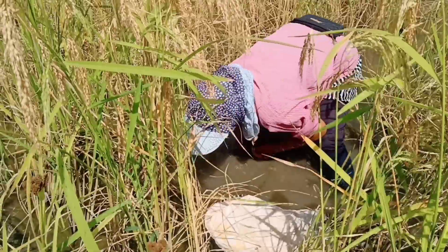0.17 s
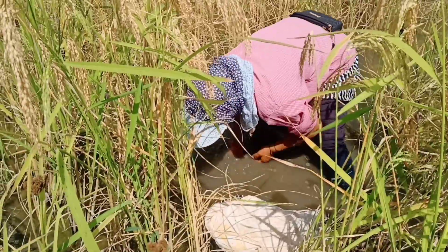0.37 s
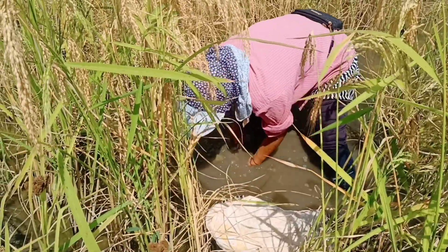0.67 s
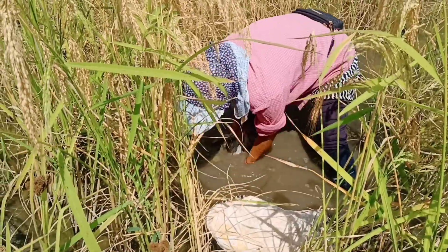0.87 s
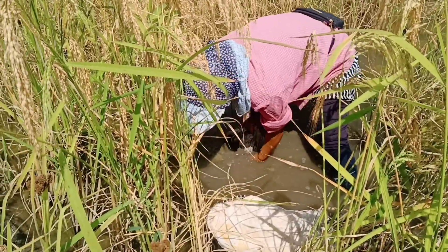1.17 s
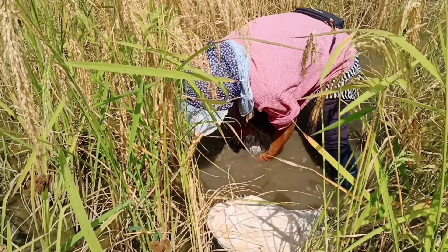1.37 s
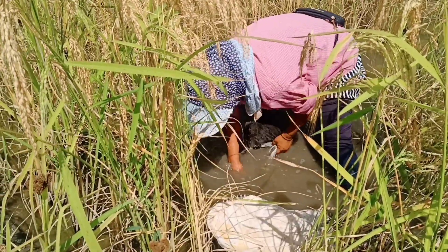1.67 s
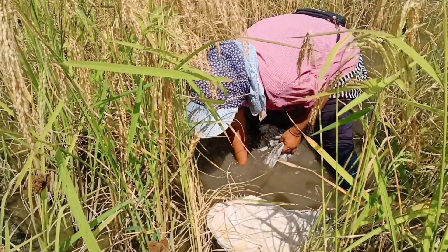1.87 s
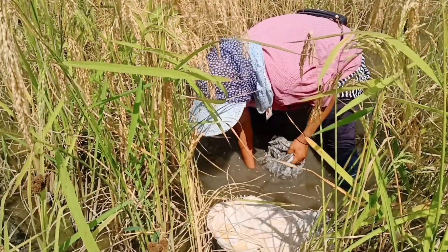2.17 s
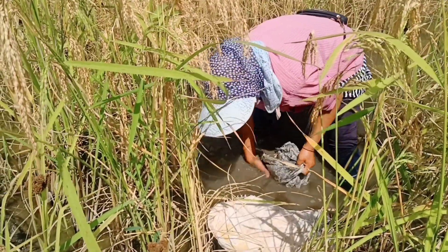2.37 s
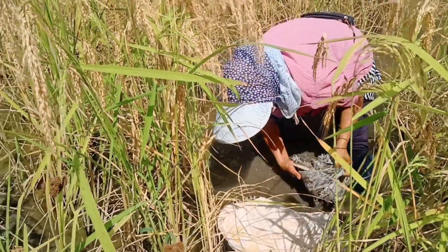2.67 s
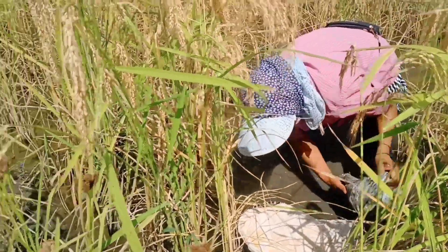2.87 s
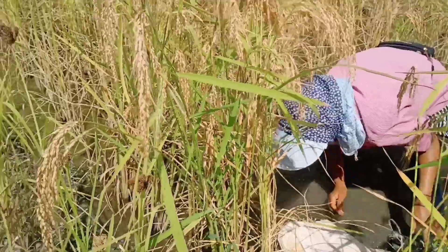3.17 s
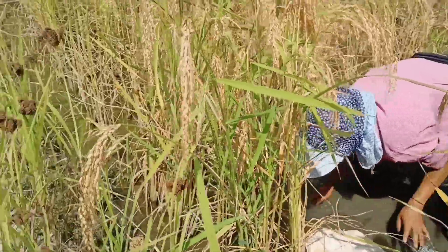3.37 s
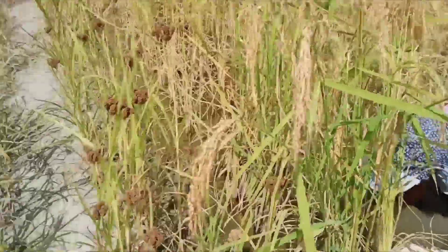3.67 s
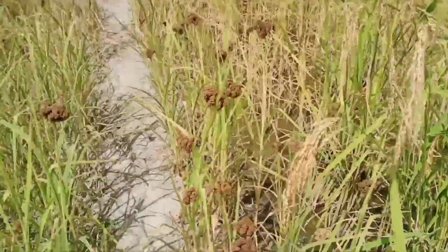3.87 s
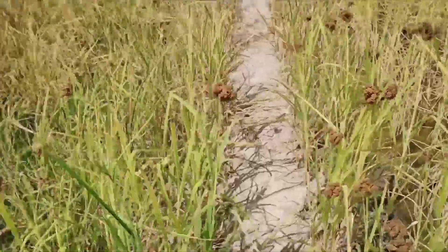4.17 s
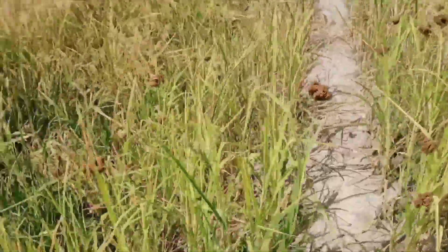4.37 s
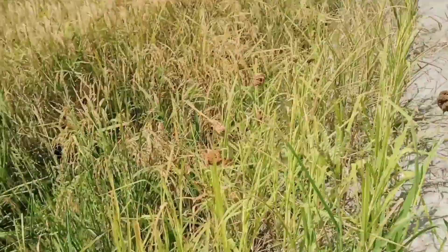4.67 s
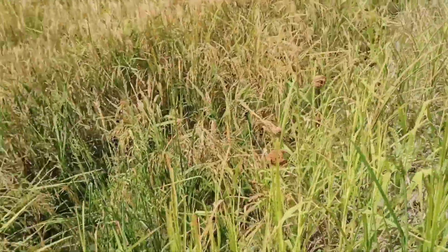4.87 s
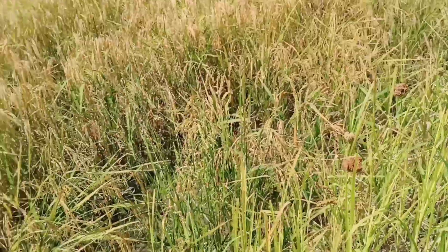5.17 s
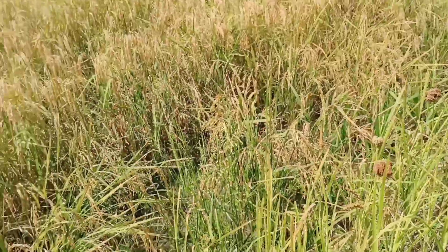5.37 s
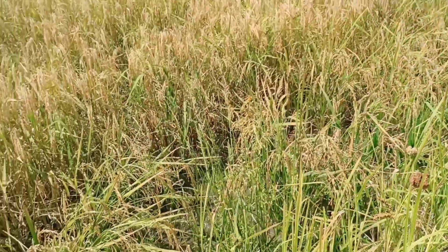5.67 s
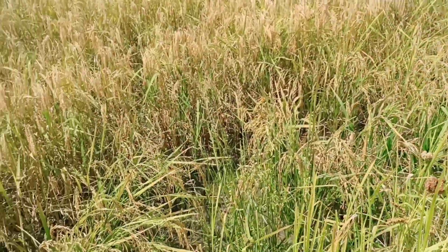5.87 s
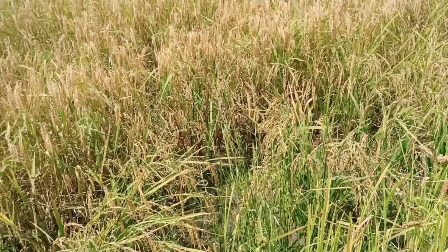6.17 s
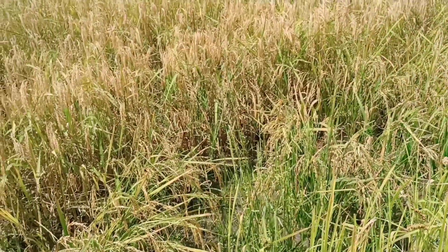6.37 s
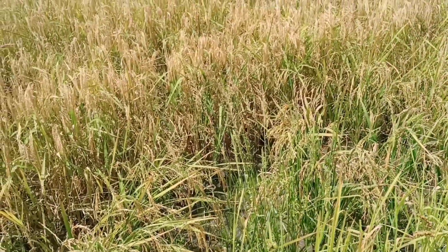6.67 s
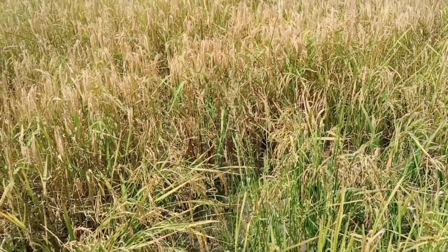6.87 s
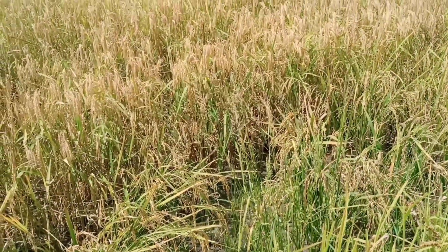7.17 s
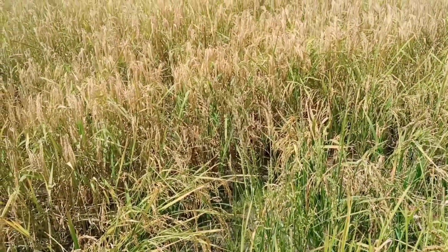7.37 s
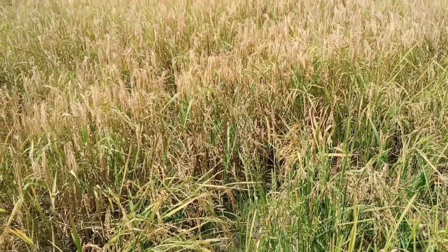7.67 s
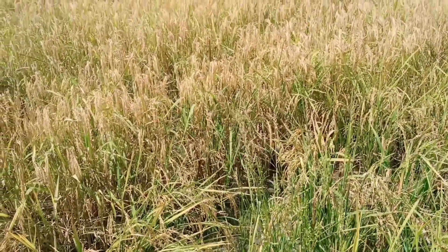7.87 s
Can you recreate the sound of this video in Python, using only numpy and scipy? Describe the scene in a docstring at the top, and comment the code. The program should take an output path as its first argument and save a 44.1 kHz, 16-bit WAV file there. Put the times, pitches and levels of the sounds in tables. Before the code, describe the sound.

A faint trickle breaks into a gurgling, splashing pour through a muddy paddy bank, later duller, with crisp dry-stalk ticks near the microphone.

```python
"""Muddy water drains through a gap in the bank of a rice paddy: deep gurgles, dense babble and fine spray.
It trickles until a plug of mud and cloth is pulled out at 1.5 s, then pours; big air pockets ring above it.
The water is made of swarms of short rising sine rings over noise, filtered to the tone of each layer.
The microphone turns away over the field, and dry rice leaves close to it rustle and tick:
clumps of tiny clicks and short rings with bright cracks."""
import sys
import numpy as np
from scipy import signal
from scipy.fft import rfft, irfft, next_fast_len
from scipy.io import wavfile
from scipy.ndimage import uniform_filter1d, map_coordinates

SR = 44100
rng = np.random.default_rng(int(sys.argv[2]) if len(sys.argv) > 2 else 0)


def bounce(signal):
    """Save signal as a 16-bit WAV file at the path given by the first command-line argument."""
    frames = np.transpose(np.atleast_2d(signal))
    limited = np.clip(frames, -1, 1)
    pcm = np.round(limited * 32767).astype(np.int16)
    wavfile.write(sys.argv[1], SR, pcm)


N = 353549
TIME = np.arange(N) / SR


def pour(screened):
    """The open drain: gurgles under a babble of small bubbles and spray, all surging together."""
    # the jet as heard at the microphone, before surges and slops:
    # (time [s], babble level [dB], spray level before a 2 dB lift [dB])
    flow = [(1.5, -57, -57), (1.59, -53, -54), (1.75, -47.5, -48.5), (2.13, -38, -41), (2.86, -34.5, -39.5),
            (3.28, -33.5, -35.5), (3.57, -38.5, -38), (3.66, -35, -38), (4.57, -37.5, -36),
            (5.76, -36, -34), (7.07, -41, -39.5), (7.56, -39.5, -40), (7.98, -43, -43.5), (8.02, -49, -49)]
    # large bubbles gather in the channel as it fills: (time [s], gurgle level before surges [dB])
    gurgling = [(1.5, -51.5), (2.1, -46), (2.45, -46), (2.85, -40), (3.5, -41), (4.1, -37.5), (4.6, -39),
                (5.5, -41.5), (6.9, -40), (7.5, -38), (8.02, -42)]
    # the jet slops over and splashes: (peak time [s], fall time constant [s], rise over the flow [dB])
    slops = [(1.561, 0.043, 9.5), (1.73, 0.012, 4.5), (1.795, 0.013, 14), (1.85, 0.012, 6), (3.217, .08, 1),
             (4.15, 0.027, 3.5), (4.274, 0.052, 3.5), (5.596, 0.037, 5), (5.737, 0.019, 6),
             (6.2, 0.11, 0.5), (6.407, 0.061, 3), (6.785, 0.026, 3.5), (7.106, 0.08, 3.5), (7.604, .06, 3)]

    babble_db, spray_db = curves(flow)
    [gurgle_db] = curves(gurgling)
    surge = wobble(22)
    slop_db = sum(db * swell(s, fall_s, rise=0.32) for s, fall_s, db in slops)
    # slops lift the spray in full, the babble less and the gurgle not at all
    deep_water = amp(2.0 * surge) * gurgle(gurgle_db)
    small_bubbles = amp(babble_db + 0.78 * slop_db + 0.64 * surge) * babble(screened)
    droplets = amp(spray_db + 2 + slop_db + 0.58 * surge) * spray(screened)
    return deep_water + small_bubbles + droplets


def gurgle(gurgle_db):
    """Large bubbles tumble in the channel; deeper, shorter thuds when the gap swallows air."""
    # tone of the tumbling bubbles: (frequency [Hz], relative level [dB])
    tumbling_tone = [(20, -41), (45, -3.5), (80, -1), (170, -9), (300, 2), (520, -0.5), (650, -9.5),
                     (1000, -4), (2000, -63)]
    # tone of the deep thuds: (frequency [Hz], relative level [dB])
    thud_tone = [(20, -27), (45, -18), (80, 0), (120, -1), (170, 0.5), (300, -7), (600, -8.5), (900, -7),
                 (1200, -13.5), (2000, -55.5)]
    # the gap swallows air and churns, and one short low thump at 6.56 s: (start [s], length [s], level before
    # surges [dB])
    swallows = [(1.545, 0.093, -40), (1.69, .06, -47), (1.775, 0.082, -37.5), (1.9, .04, -35.5),
                (2.0, 0.055, -36.5), (2.055, 0.047, -32), (2.12, .07, -37.5), (2.2, 0.11, -46),
                (4.69, 0.25, -42), (4.98, 0.24, -37.5), (6.56, 0.023, -45), (7.33, .06, -43)]
    churn_db = -9.5  # churning between swallows, against the gurgle

    large = swarm(rate=260, low_hz=190, high_hz=949, cycles=19.0, rise=0.23, spread_db=2.0, noise_db=-5.0)
    thuds = swarm(rate=300, low_hz=82.0, high_hz=1047, cycles=8.5, rise=0.17, spread_db=2.5, noise_db=-7)
    tumbling = coloured(large, tumbling_tone)
    churning = coloured(thuds, thud_tone)
    churn_gain = amp(gurgle_db + churn_db) + held(swallows, attack_s=0.016, release_s=0.027)
    return amp(gurgle_db) * tumbling + churn_gain * churning


def babble(screened):
    """Small bubbles where the jet plunges; hollower when heard through the stalks."""
    # tone with the microphone facing the jet: (frequency [Hz], relative level [dB])
    facing_tone = [(250, -24), (600, -4), (900, -5.5), (1200, -3.5), (1700, -2), (2100, -5), (2650, -12.5),
                   (2950, -10.5), (3500, -18.5), (5000, -17), (8000, -60)]
    # tone heard from behind plug or stalks: (frequency [Hz], relative level [dB])
    away_tone = [(250, -28), (620, -12), (880, -7), (1130, -7.5), (1380, -7), (1620, 0), (1950, -1),
                 (2280, -11.5), (2520, -8.5), (3050, -16), (3600, -18), (5000, -56), (8000, -64)]

    small = swarm(rate=1300, low_hz=560.0, high_hz=4146, cycles=31.0, rise=0.16, spread_db=3.0, noise_db=-1.5)
    bubbles = patchy(small, depth_db=1.5)
    return blend(coloured(bubbles, facing_tone), coloured(bubbles, away_tone), screened)


def spray(screened):
    """Droplets and bursting foam, thrown in quick spurts."""
    # tone with the microphone facing the jet: (frequency [Hz], relative level [dB])
    facing_tone = [(1800, -28), (3300, -7), (4300, -1), (5000, -0.5), (5800, -2), (6600, -2), (7400, 2.5),
                   (8200, 5), (9200, -3.5), (10500, -12.5), (13000, -11), (16000, -5)]
    # tone heard from behind plug or stalks: (frequency [Hz], relative level [dB])
    away_tone = [(1800, -29), (3200, -12.5), (4200, -3.5), (4950, 1.5), (5700, -6), (6600, -9),
                 (7400, -1.5), (8200, 5), (9200, -.5), (10500, -9), (13000, -6), (15500, 1)]

    fine = swarm(rate=2000, low_hz=3000, high_hz=14000, cycles=25.4, rise=0.062, spread_db=4.0, noise_db=0.5)
    drops = patchy(fine, depth_db=1.5)
    heard = blend(coloured(drops, facing_tone), coloured(drops, away_tone), screened)
    spurts = amp(1.2 * wobble(95))
    return unit(heard * spurts)


def gulps(cycles=15, rise=0.18):
    """Single air pockets ring out above the flow; small ones last more cycles than big ones."""
    # big air pockets: (time [s], peak level before a 3.5 dB cut [dB], pitch before a 1.2 % drop [Hz])
    pockets = [(.18, -48, 1300), (0.647, -38, 1650), (.666, -36, 1020), (.858, -35, 640),
               (0.891, -37, 1640), (1.07, -39, 1000), (1.342, -39.5, 298), (1.366, -44, 1130),
               (1.404, -46, 1200), (1.486, -42, 2300), (1.504, -37, 1930), (1.536, -29.5, 840),
               (1.564, -27, 437), (1.564, -30.5, 1500), (1.604, -27, 970), (1.63, -26, 185),
               (1.779, -24.5, 250), (1.826, -26, 161), (1.833, -23.5, 720), (1.864, -30, 230),
               (1.924, -25.5, 272), (2.006, -19, 960), (2.064, -19.5, 680), (2.089, -22, 680),
               (2.158, -21.5, 1005), (2.309, -22.5, 870), (3.025, -21.5, 415), (3.093, -24, 745),
               (3.969, -22, 296), (4.035, -18.5, 510), (4.07, -24, 286), (4.523, -20.5, 530),
               (4.79, -26, 190), (4.869, -25, 296), (4.917, -25, 217), (4.989, -20, 248), (5.019, -24, 334),
               (5.032, -23, 890), (5.044, -24, 177), (5.084, -23, 220), (5.115, -19, 893),
               (5.188, -23, 470), (5.21, -25, 260), (5.249, -19.5, 497), (5.527, -23, 1800),
               (5.613, -23, 1900), (5.75, -21, 1850), (6.408, -25, 278), (6.61, -23, 910),
               (6.746, -23, 870), (7.046, -22, 870), (7.215, -25, 342), (7.334, -27, 227),
               (7.379, -26.5, 258), (7.433, -18.5, 553), (7.447, -17.5, 506), (7.475, -23, 430),
               (7.52, -23.5, 306), (7.676, -22.5, 257)]

    out, t = np.zeros(N), np.arange(SR // 6) / SR
    for s, db, hz in pockets:
        pocket_cycles = cycles * (hz / 400) ** 1.2
        pocket = ring(t, hz * 0.988, pocket_cycles, rise)
        add(out, s, amp(db - 3.5) * pocket / abs(pocket).max())
    return out


def seep(screened):
    """The plugged drain: sparse soft bubbles and a few droplets, louder as hands stir the pool."""
    # hands stir the pool at the plug: (start [s], length [s], lapping level [dB])
    stirs = [(.58, 0.5, -54.5), (1.33, 0.27, -62)]
    # tone of the lapping pool: (frequency [Hz], relative level [dB])
    lapping_tone = [(20, -27), (50, 1.5), (120, 4), (250, -2.5), (420, -3.5), (750, -6), (1020, -4.5),
                    (1350, -9), (1650, -11), (2000, -15), (2800, -23), (4000, -21.5), (8000, -62)]
    seep_db, droplets_db = -59, -6  # lapping at rest; droplets against the lapping

    bubbles = swarm(rate=460, low_hz=200.0, high_hz=2870, cycles=21, rise=.2, spread_db=1.5, noise_db=0.5)
    lapping = coloured(bubbles, lapping_tone)
    stirring = amp(seep_db) + held(stirs, attack_s=0.033, release_s=0.1)
    return stirring * (lapping + amp(droplets_db) * spray(screened))


def leaves():
    """Dry blades close to the microphone scrape each other in clumps of tiny clicks."""
    # dry blades brush past each other: (peak time [s], fall time constant [s], level [dB])
    brushes = [(.285, .03, -53), (0.61, 0.11, -45.5), (0.953, .04, -49), (1.385, .025, -54),
               (1.635, 0.032, -37), (1.71, 0.02, -35), (1.785, .018, -38), (2.24, .08, -48),
               (3.264, 0.16, -24), (3.48, .07, -27), (3.678, 0.18, -30.5), (5.39, 0.056, -34),
               (5.6, .3, -41), (6.11, .05, -33), (6.645, 0.056, -35), (7.213, .03, -36), (7.7, 0.94, -41)]
    # tone of the dry blades: (frequency [Hz], relative level [dB])
    leaf_tone = [(2500, -49), (5000, -7.5), (7000, -14), (8400, -3.5), (10500, -8.5), (12500, -4.5),
                 (14200, 2.5), (15500, 1)]
    rustle_db = -63  # the leaves at rest

    clicks = swarm(rate=1600, low_hz=4960, high_hz=16200, cycles=13, rise=0, spread_db=2.0, noise_db=3)
    scraping = coloured(patchy(clicks, depth_db=-1.0), leaf_tone)
    clumps = amp(2.1 * wobble(75))
    brush_power = sum((amp(db) * swell(s, fall_s, rise=0.47)) ** 2 for s, fall_s, db in brushes)
    return np.sqrt(amp(rustle_db) ** 2 + brush_power) * unit(scraping * clumps)


def ticks(cycles=26, crack_t60=0.0055, crack_db=-12):
    """A stalk snaps: a short ring and a bright crack as its fibres tear; drops slap with the same sound."""
    # stalks snapping and drops slapping: (time [s], peak level before a 5 dB lift [dB], pitch [Hz])
    snaps = [(.279, -40, 14000), (1.706, -27, 8700), (1.791, -20, 14500), (1.795, -20.5, 8900),
             (1.796, -25, 4930), (2.345, -24, 4640), (2.825, -24, 8400), (3.204, -21.5, 7100),
             (3.478, -17, 14600), (3.642, -17, 14600), (3.687, -10, 8250), (3.691, -6, 14500),
             (3.6915, -15.5, 5770), (3.887, -22, 4990), (4.076, -17, 8400), (4.305, -20, 7860),
             (4.691, -17, 8100), (4.964, -19, 7900), (5.426, -20, 8600), (5.542, -10, 15100),
             (5.568, -18.5, 8300), (5.601, -19, 8360), (6.32, -20, 4700), (6.408, -20, 9000),
             (7.217, -21, 8200)]

    out, t = np.zeros(N), np.arange(SR // 40) / SR
    crack_decay = np.exp(-np.log(1000) * t / crack_t60)  # falls 60 dB in crack_t60 seconds
    for s, db, hz in snaps:
        crack = np.diff(rng.standard_normal(len(t) + 1)) * crack_decay  # differencing brightens the noise
        snap = ring(t, hz, cycles, 0) + amp(crack_db) * crack
        add(out, s, amp(db + 5.0) * snap / abs(snap).max())
    return out


def ground_notch(x, centre_hz, depth_db, width_hz=330):
    """Sound off the wet ground cancels the direct sound in a band that slides as the microphone moves."""
    hz, t, z = signal.stft(x, SR, nperseg=512)
    offset = (hz[:, None] - np.interp(t, TIME, centre_hz)) / width_hz
    notch_db = -np.interp(t, TIME, depth_db) / (1 + offset ** 2)
    return signal.istft(z * amp(notch_db), nperseg=512)[1][:N]


def ring(t, hz, cycles, rise):
    """A bubble: it swells within half a cycle, dies by 60 dB over its cycles and climbs in pitch as it surfaces."""
    turns = np.float32(t) * np.float32(hz)
    age = turns / np.float32(cycles)
    tone = np.sin(2 * np.pi * turns * (1 + np.float32(rise / 2) * age))
    decay = np.exp(-np.float32(np.log(1000)) * age)
    return tone * decay * np.minimum(2 * turns, 1)


def swarm(rate, low_hz, high_hz, cycles, rise, spread_db, noise_db):
    """Random bubbles, droplets or clicks of uneven size, rate a second, over a bed of white noise."""
    u = rng.random((int(rate * N / SR), 4))
    hz = low_hz * (high_hz / low_hz) ** u[:, :1]
    life = cycles * 2 ** (u[:, 1:2] - .5)
    # weighting by pitch keeps the spectrum flat from low to high
    size = amp(-spread_db * np.log(1 - .99 * u[:, 2:3])) * hz / high_hz
    start = (u[:, 3:] * N).astype(int)
    out = np.zeros(N)
    octave = np.floor(np.log2(hz[:, 0] / low_hz))
    for k in np.unique(octave):  # low bubbles need longer rows
        rows = octave == k
        n = np.arange(int(cycles * SR / (low_hz * 2 ** k)))
        waves = size[rows] * ring(n / SR, hz[rows], life[rows], rise)
        out += np.bincount((start[rows] + n).ravel(), waves.ravel(), N)[:N]
    # noise_db compares noise and swarm within the band from low to high
    noise = rng.standard_normal(N) * np.sqrt(SR / 2 / (high_hz - low_hz))
    return unit(out) + amp(noise_db) * noise


def patchy(x, depth_db):
    """Bubbles come in shoals of like size: narrow bands swell and fade within hundredths of a second."""
    z = signal.stft(x, nperseg=512)[2]
    across_pitch = uniform_filter1d(rng.standard_normal(z.shape), size=3, axis=0)
    field = uniform_filter1d(across_pitch, size=5, axis=1)
    return signal.istft(z * amp(depth_db * unit(field)), nperseg=512)[1][:N]


def coloured(x, points, size=8192):
    """x through a causal minimum-phase filter with the (Hz, dB) shape, at rms 1."""
    hz, db = np.transpose(points)
    bins_hz = np.fft.rfftfreq(size, 1 / SR)
    shape_db = np.interp(np.log(bins_hz + 1), np.log(hz), db)
    cepstrum = irfft(np.log(amp(shape_db)))
    # folding the cepstrum forward in time makes the filter causal
    cepstrum[1:size // 2] *= 2
    cepstrum[size // 2 + 1:] = 0
    impulse = irfft(np.exp(rfft(cepstrum)))
    return unit(signal.oaconvolve(x, impulse)[:N])


def wobble(rate):
    """A smooth random curve, rate knots a second."""
    coarse = TIME[::32]
    knots = rng.standard_normal(int(N * rate / SR) + 4)
    return np.interp(TIME, coarse, map_coordinates(knots, [coarse * rate]))


def held(rows, attack_s, release_s):
    """Gain of (start, length, dB) events that rise, hold and die away."""
    gain = 0
    for s, length, db in rows:
        attack = np.clip((TIME - s) / attack_s, 0, 1)
        release = np.exp(-np.maximum(TIME - s - length, 0) / release_s)
        gain = gain + amp(db) * attack * release
    return gain


def swell(peak_s, fall_s, rise):
    """An exponential swell to 1 at its peak; the rise time constant is a share of the fall's."""
    t = (TIME - peak_s) / fall_s
    return np.exp(-np.maximum(t, -t / rise))


def curves(rows):
    """One value per sample for each column after the time."""
    s, *cols = np.transpose(rows)
    return [np.interp(TIME, s, c) for c in cols]


def blend(a, b, share):
    """Equal-power fade from a to b."""
    share = np.clip(share, 0, 1)
    return np.sqrt(1 - share) * a + np.sqrt(share) * b


def add(track, s, sound):
    """Mix a sound in at s seconds."""
    part = track[round(s * SR):][:len(sound)]
    part += sound[:len(part)]


def amp(db):
    """Decibels to amplitude."""
    return 10 ** (np.asarray(db) / 20)


def unit(x):
    """Scale to rms 1."""
    return x / np.sqrt(np.mean(x ** 2) + 1e-20)


def scene():
    """The seep gives way to the pour as the plug comes out; leaves and ticks join near the microphone."""
    # the microphone: (time [s], share of water screened by plug or stalks [0-1],
    # ground notch centre [Hz], notch depth, negative for a lift [dB])
    pose = [(0, 0.85, 3000, 2), (1.4, 1, 3300, 2), (1.8, 0.1, 3500, 6), (2.5, 0.11, 3750, 12.5),
            (2.9, 0.19, 3630, 8), (3.4, 0.1, 3570, 8), (4, 0.09, 3130, 10.5), (4.5, 0, 2970, 5),
            (4.9, 0.98, 3100, 6.5), (5.3, 0.95, 3320, 6), (5.6, 1, 3180, 0.5), (8, 0.92, 3230, -2)]
    plug_out_s, opening_s = 1.49, 0.09  # the plug gives way, and how long that takes

    screened, notch_hz, notch_db = curves(pose)
    opened = (TIME - plug_out_s) / opening_s
    water = blend(seep(screened), pour(screened), opened) + gulps()
    return ground_notch(water + leaves() + ticks(), notch_hz, notch_db)[None]


def record(dry, low_cut_hz=45, top_hz=15650):
    """The small microphone loses the deepest bass; the recorder keeps nothing above its band limit."""
    thin = signal.sosfilt(signal.butter(2, low_cut_hz, "high", fs=SR, output="sos"), dry)
    m = next_fast_len(N + SR // 2)
    kept = np.fft.rfftfreq(m, 1 / SR) < top_hz
    return irfft(rfft(thin, m) * kept, m)[:, :N]


dry = scene()
out = record(dry)
bounce(out)
```